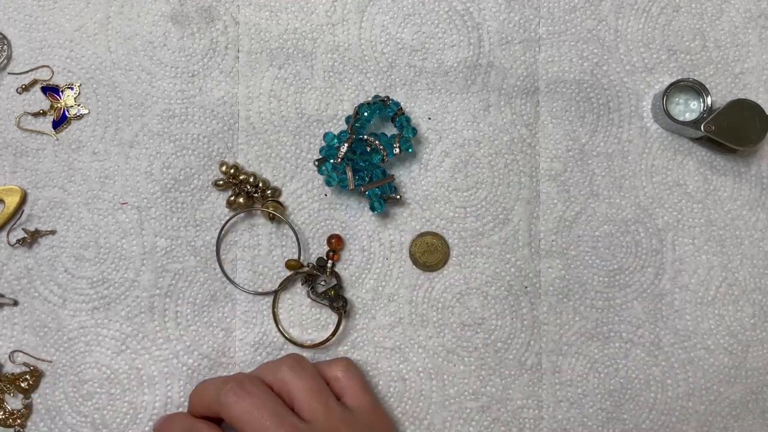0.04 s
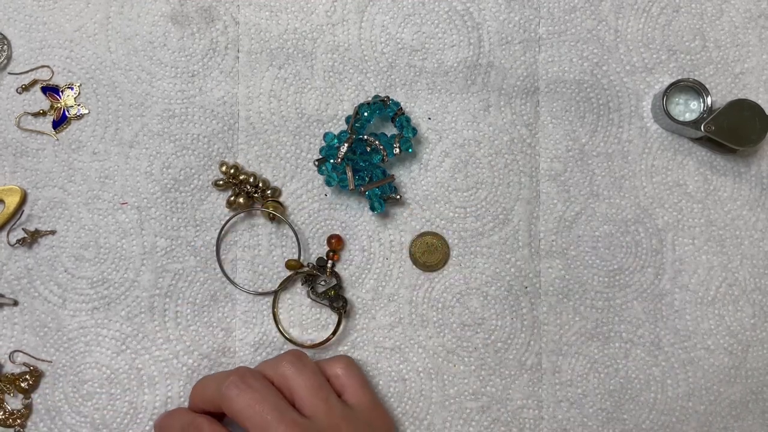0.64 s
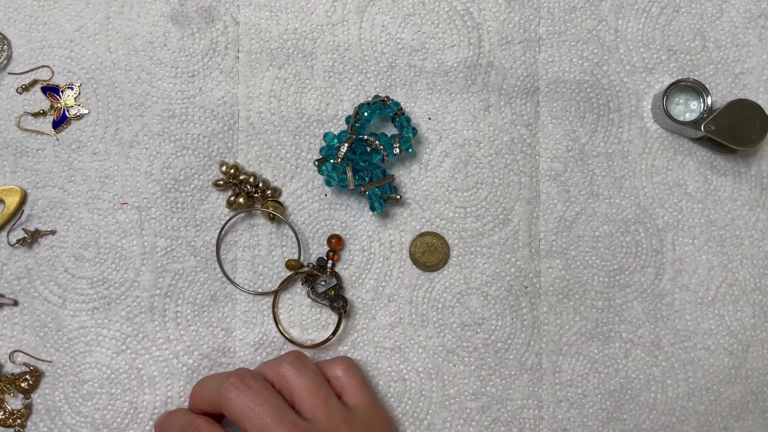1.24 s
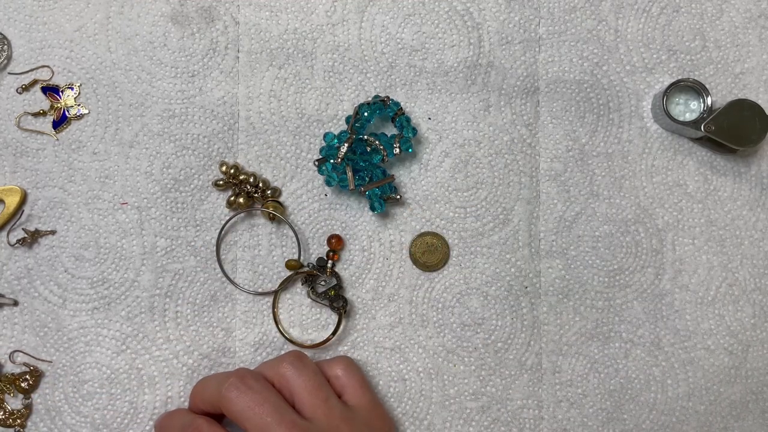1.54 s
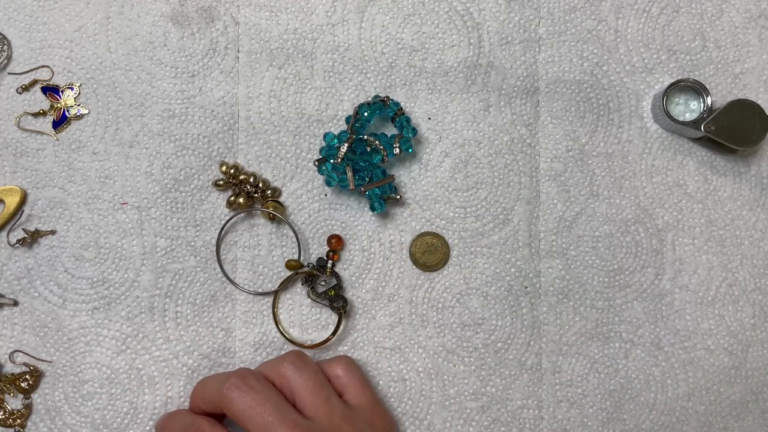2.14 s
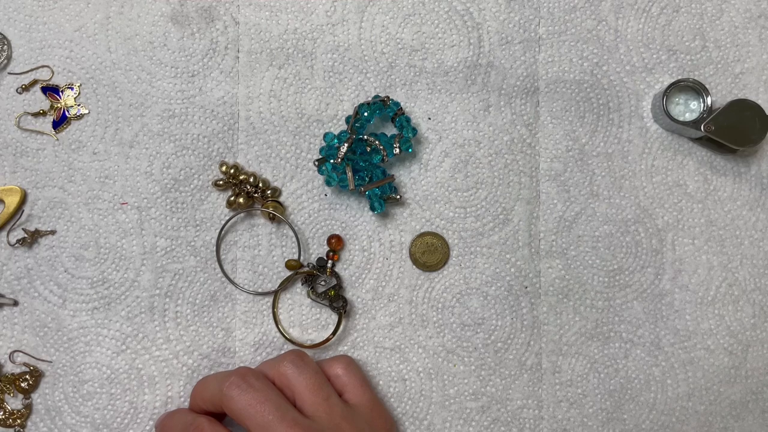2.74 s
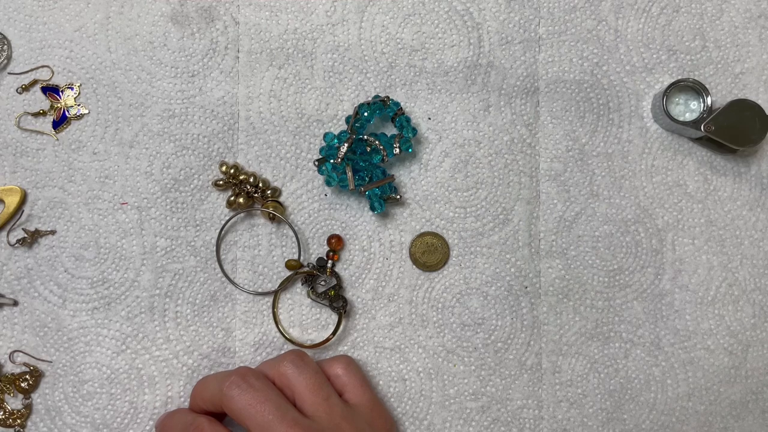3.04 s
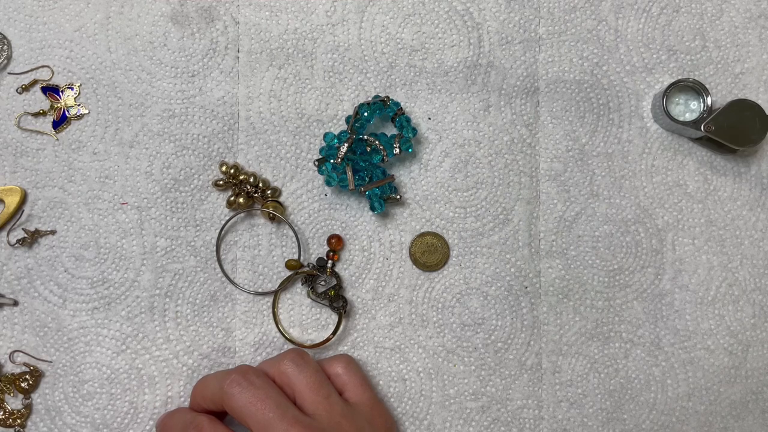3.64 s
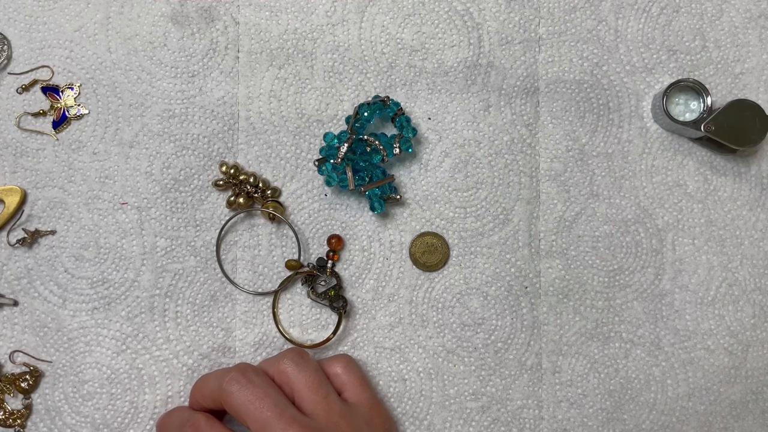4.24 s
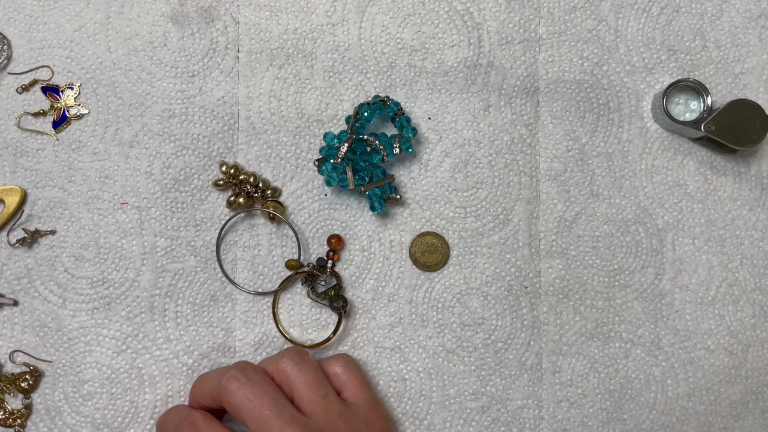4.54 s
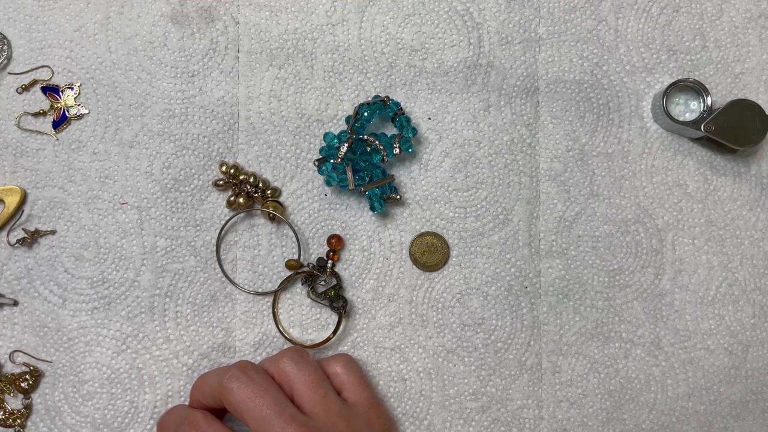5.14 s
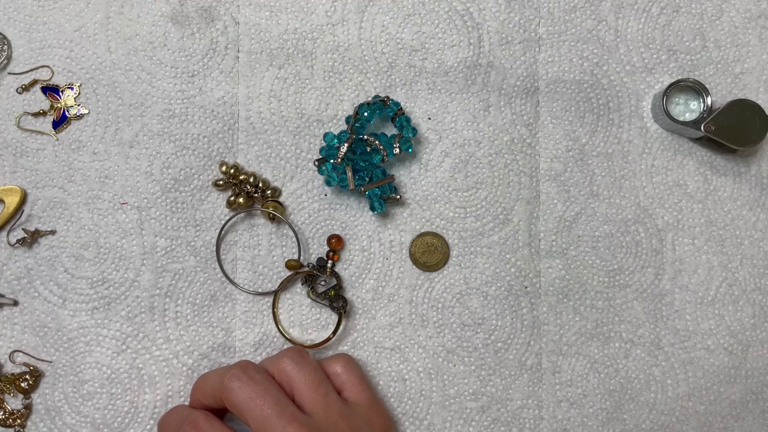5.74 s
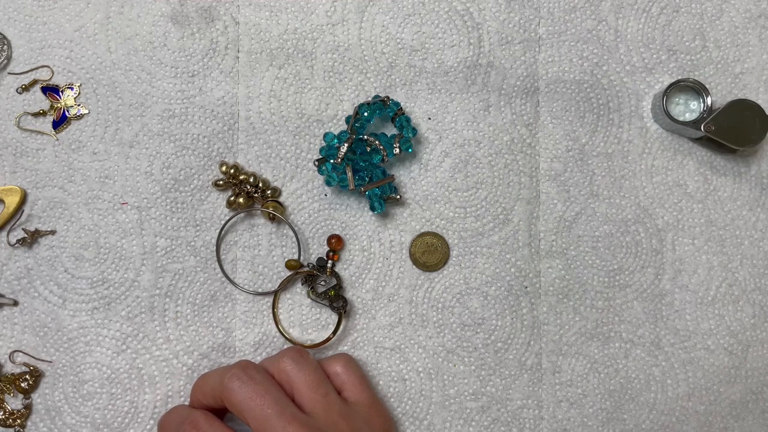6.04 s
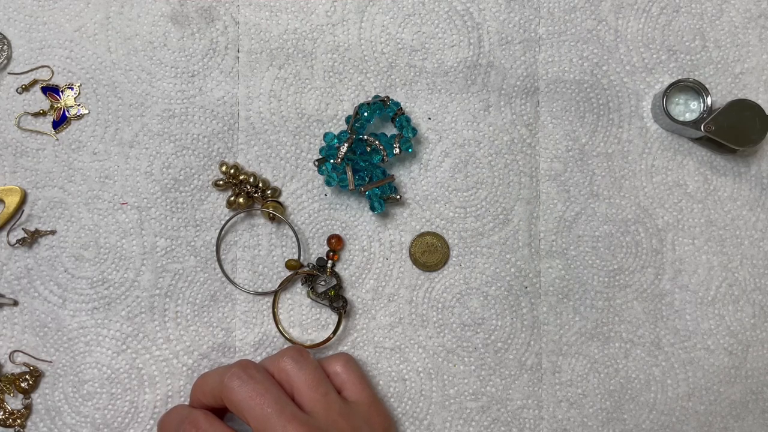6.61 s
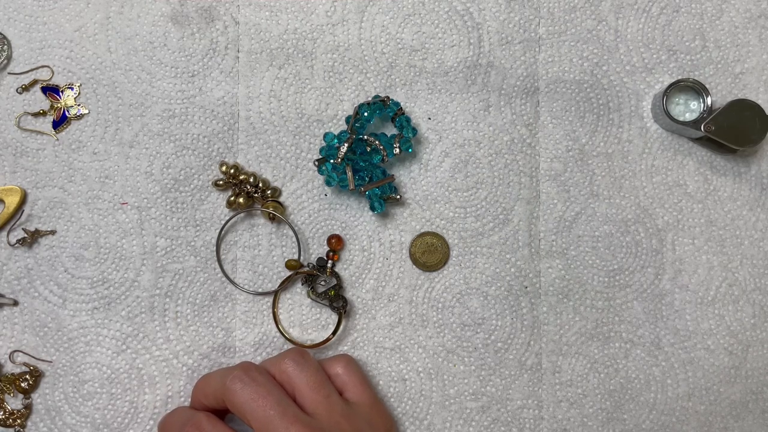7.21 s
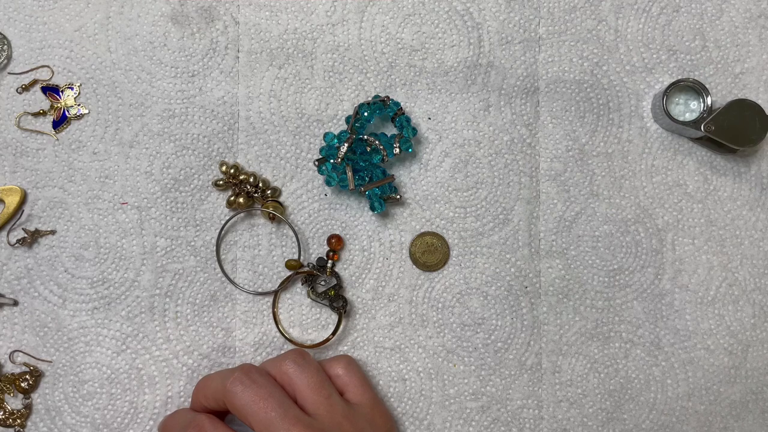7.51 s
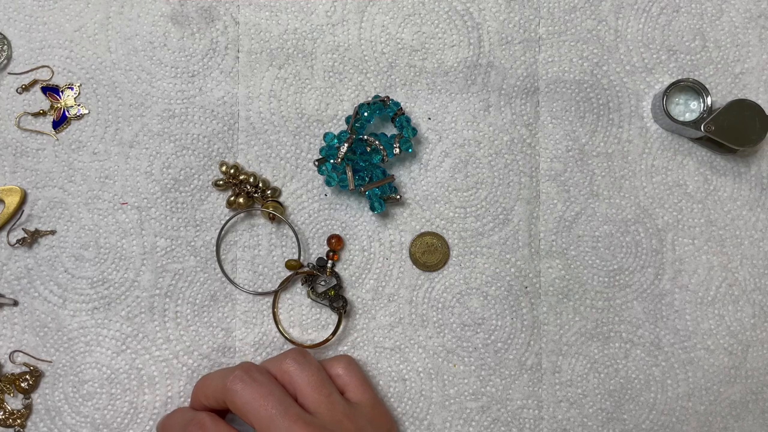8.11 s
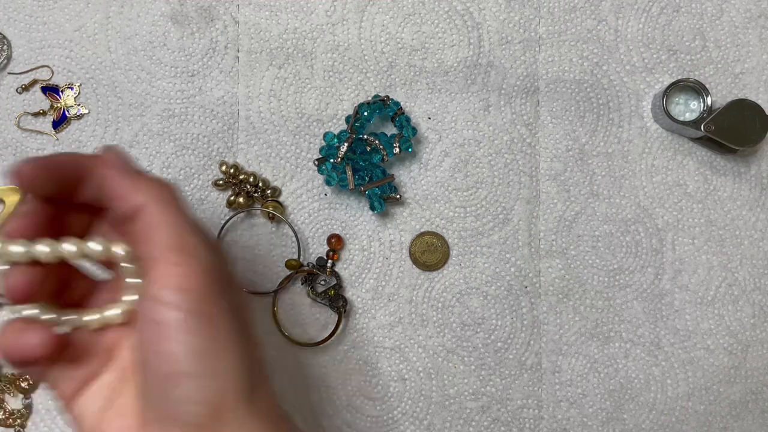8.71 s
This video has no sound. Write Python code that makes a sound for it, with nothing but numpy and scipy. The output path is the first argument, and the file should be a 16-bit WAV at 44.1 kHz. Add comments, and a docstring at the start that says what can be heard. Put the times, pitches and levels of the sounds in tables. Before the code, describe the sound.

A motor hums faintly somewhere in the house while fingers sort beads and small metal jewellery on a paper towel, near the microphone and a little to the left. A first cluster of taps and scrapes leads to one louder knock on the table. A pause follows, then more uneven clicks, hollow metal bumps, two tiny wire pings and a short scrape on the paper, ending with a few soft ticks.

```python
"""A small room, close to a table covered with a paper towel; two microphones in one case, to its right.
A motor hums somewhere in the house. A fingertip brushes the paper, then bead jewellery is picked over:
strands drag, pieces knock on the table top, beads click. At 2 s a slide makes the table groan, the
loudest knock lands and a hollow metal piece is bumped. After a lull the sorting goes on: a wire ring
pings twice, a hard edge rasps on the paper near 5.7 s, and the handling thins to a few light ticks."""
import sys
import numpy as np
from scipy import signal
from scipy.fft import rfft, irfft, next_fast_len
from scipy.io import wavfile

SR = 44100
rng = np.random.default_rng(int(sys.argv[2]) if len(sys.argv) > 2 else 0)


def store_wav(level_fs):
    """Save 16-bit WAV to argv[1]."""
    pcm = np.round(np.clip(np.atleast_2d(level_fs), -1, 1) * 32767)
    wavfile.write(sys.argv[1], SR, pcm.T.astype(np.int16))


N = 386316
TIME = np.arange(N) / SR

# Pieces land on the table. Each row: start in seconds, level in dB, fade in ms, pitch of the spot in Hz.
LANDINGS = [(0.3, -34.5, 1.7, 343), (0.367, -24.5, 0.81, 457), (0.516, -17.5, 2.1, 450),
            (0.701, -21, 1.1, 435), (0.775, -23.5, 0.56, 560), (1.123, -36, 1.8, 323),
            (1.214, -22, 0.23, 380), (2.3096, -7, 1.75, 400), (3.620, -16, 2.43, 517),
            (3.888, -27, 0.91, 540), (4.321, -32, 2.5, 496), (4.401, -25.5, 2.6, 502),
            (4.430, -21.5, 1.1, 490), (4.782, -25.5, 1, 445), (4.829, -23.5, 0.62, 370),
            (4.866, -23, 1.66, 510), (5.146, -32, 1.7, 534), (5.405, -26, 2.05, 463),
            (5.529, -33.5, 2.8, 460), (6.3319, -25.5, 3.6, 444), (7.153, -31, 2, 437),
            (7.170, -33, 3.4, 430), (7.227, -25, 1.47, 476), (7.447, -39.5, 3.4, 350),
            (8.2979, -39, 1, 720)]
# The bright colour of ticks and paper hiss. Each row: frequency in Hz, relative level in dB.
BRIGHT_SPECTRUM = [(1500, -45.5), (2700, -4), (4500, 2.5), (6500, -7.5), (8300, 5.5), (9500, 8),
                   (11000, 0.5), (15700, -1)]
# The dull colour of the table top. Each row: frequency in Hz, relative level in dB.
TABLE_SPECTRUM = [(130, -11), (250, -8.5), (370, -4), (510, -5), (1000, -20), (4000, -80.5)]


def from_db(db):
    """Decibels to gain."""
    return 10 ** (np.asarray(db) / 20)


def rms_one(x):
    """Scale to rms 1."""
    return x / np.sqrt(np.mean(x ** 2) + 1e-20)


def at_hz(points, hz):
    """Read a table on a log-frequency axis."""
    knots, values = np.transpose(points)
    return np.interp(np.log(np.maximum(hz, 1)), np.log(knots), values)


def butterworth(x, hz, kind, order=2):
    """Low-, high- or band-pass filter."""
    return signal.sosfilt(signal.butter(order, hz, kind, fs=SR, output="sos"), x + 1e-18)


def coloured(x, spectrum, size=8192):
    """Minimum-phase filter with the given spectrum; white noise keeps its power."""
    gains = from_db(at_hz(spectrum, np.fft.rfftfreq(size, 1 / SR)))
    cepstrum = irfft(np.log(gains))
    cepstrum[1:size // 2] *= 2
    cepstrum[size // 2 + 1:] = 0
    response = irfft(np.exp(rfft(cepstrum)))
    return signal.oaconvolve(x, response / np.linalg.norm(response))[:N]


def drift(per_s):
    """Smooth random wander of rms 1."""
    knots = rng.standard_normal(N // 10)
    return rms_one(np.interp(TIME * per_s, np.arange(len(knots)), knots))


def add(track, s, sound):
    """Mix a sound into a track at s seconds."""
    start = max(round(s * SR), 0)
    track[start:start + len(sound)] += sound[:max(N - start, 0)]


def motor_hum(shaft_hz=29.65, waver_db=3.5, waver_turns=0.022):
    """A motor elsewhere in the house hums on multiples of its shaft rate, wavering a little."""
    # Each row: multiple of the shaft rate, rms level in dB.
    harmonics = [(2, -55.5), (3, -51.5)]
    turns = shaft_hz * TIME + waver_turns * drift(0.65)
    hum = 0
    for multiple, db in harmonics:
        amplitude = from_db(db + waver_db * drift(6.1)) * np.sqrt(2)
        hum += amplitude * np.sin(2 * np.pi * (multiple * turns + rng.random()))
    return hum


def room_tone(level_db=-52):
    """The low rumble of the house, a little different at each microphone."""
    # Each row: frequency in Hz, relative level in dB.
    air_spectrum = [(20, -27), (40, -18.5), (62, -8.5), (80, 0.5), (100, -13.5), (137, -9.5), (160, -17.5),
                    (240, -18), (400, -28), (1000, -48), (2600, -57.5), (9000, -62.5)]
    # Stereo width. Each row: frequency in Hz, side against mid in dB.
    air_width = [(25, -1.5), (120, -11.5), (240, -5), (900, 2), (7500, -1), (15000, -9)]
    mid, side = [coloured(rng.standard_normal(N), air_spectrum) for _ in range(2)]
    size = next_fast_len(N)
    side_gain = from_db(at_hz(air_width, np.fft.rfftfreq(size, 1 / SR)))
    side = irfft(rfft(side, size) * side_gain, size)[:N]
    return from_db(level_db) * (mid + side * [[1], [-1]])


def friction(per_s, spread_db, smooth):
    """Fibres catch and let go: snaps of uneven size over a smooth hiss; rms 1."""
    sizes = from_db(spread_db * np.minimum(rng.exponential(1, N), 4)) * rng.choice([-1, 1], N)
    snaps = sizes * (rng.random(N) < per_s / SR)
    return rms_one(rms_one(snaps) + smooth * rng.standard_normal(N))


def fingertip_brushes(edge_s=.02):
    """Soft skin on paper: a dense, even hiss with no taps in it."""
    # Each row: start and end in seconds, level in dB.
    brushes = [(0.123, 0.32, -74.5), (1.988, 2.324, -67.5), (6.937, 7.16, -59.5), (8.224, 8.316, -70)]
    pressure = sum(from_db(db) * np.clip(np.minimum(TIME - start, end - TIME) / edge_s, 0, 1)
                   for start, end, db in brushes)
    return coloured(pressure * friction(per_s=1100, spread_db=0.5, smooth=1.5), BRIGHT_SPECTRUM)


def rattle(per_s, spread_db, smooth):
    """Beads of many sizes tap as they slide, each size in its own band; rms 1."""
    edges_hz = np.geomspace(600, 17000, 7)
    return rms_one(sum(butterworth(friction(per_s, spread_db, smooth), band, "band")
                       for band in zip(edges_hz, edges_hz[1:])))


def strand_drags(soft_db=-71, usual_db=-51, jerk_db=3, rise_s=0.022):
    """Beads and fingers slide jerkily over the embossed paper and shake the table under it."""
    # Each row: start and end in seconds, strength in dB.
    strokes = [(0.288, 0.464, -51), (0.487, 0.575, -42), (0.635, 0.721, -51), (0.773, 0.874, -56.5),
               (1.127, 1.464, -65), (1.522, 1.918, -71.5), (1.973, 2.218, -63), (2.335, 2.49, -51),
               (3.872, 4.035, -54.5), (4.573, 4.751, -64), (4.757, 4.904, -51.5), (5.037, 5.168, -52),
               (5.368, 5.426, -53), (5.528, 5.766, -56), (6.295, 6.423, -46.5), (6.433, 6.625, -62.5),
               (6.712, 7.004, -61), (7.011, 7.158, -53), (8.631, 8.687, -62.5)]
    # Each row: frequency in Hz, relative level in dB.
    scrape_spectrum = [(800, 0), (1200, 2.5), (1750, 6), (3000, -4.5), (4800, -5), (5600, -9.5),
                       (6500, -4.5), (8200, -36.5)]
    pressure, bead_share = np.zeros((3, N)), np.zeros(N)
    for start, end, db in strokes:
        span = slice(round(start * SR), round(end * SR))
        t, harder_db = TIME[span], db - usual_db
        rumble_db, scrape_db, hiss_db = -46.5 + 0.84 * harder_db, db + 1, -61.5 + 0.99 * harder_db
        envelope = np.clip(np.minimum(t - start, 2 * (end - t)) / rise_s, 0, 1)
        pressure[:, span] += from_db([rumble_db, scrape_db, hiss_db])[:, None] * envelope
        # the lightest drags are fingers alone; crackling beads take over in harder ones
        bead_share[span] = np.interp(db, [soft_db, usual_db], [0, 1])
    rumble, scrape, hiss = pressure * from_db(jerk_db * drift(70))
    beads = np.sqrt(bead_share) * rattle(per_s=300, spread_db=4, smooth=0.3)
    fingers = np.sqrt(1 - bead_share) * rng.standard_normal(N)
    grains = beads + fingers
    table = coloured(rumble * rng.standard_normal(N), TABLE_SPECTRUM)
    return table + coloured(scrape * grains, scrape_spectrum) + coloured(hiss * grains, BRIGHT_SPECTRUM)


def table_knocks(glide=0.97, glide_s=0.00069, thump_hz=131, thump_s=0.033, thump_db=-28,
                 shudder_s=0.047, shudder_db=-20):
    """Bending waves cross the table top, the high ones first, so each knock falls onto its pitch."""
    # The soft hand drops and stirs only the lowest mode. Each row: start in seconds, level in dB.
    hand_drops = [(4.326, -41), (4.867, -34.5), (5.385, -36)]
    out, shudder, t = np.zeros(N), np.zeros(N), TIME[:SR // 10]
    thump = np.exp(-t / thump_s) * np.sin(2 * np.pi * thump_hz * t)
    for s, db, fade_ms, hz in LANDINGS:
        age = t * 1000 / fade_ms
        turns = hz * (t + glide * glide_s * (1 - np.exp(-t / glide_s)))
        knock = age * np.exp(1 - age) * np.sin(2 * np.pi * turns)
        add(out, s, from_db(db) * (knock + from_db(thump_db) * thump))
        # waves reflected from the edges leave the whole top shuddering
        add(shudder, s, from_db(db + shudder_db) * np.exp(-t / shudder_s) * rng.standard_normal(len(t)))
    for s, db in hand_drops:
        add(out, s, from_db(db) * thump)
    return out + coloured(shudder, TABLE_SPECTRUM)


def contact(chatter_s, graze_s, firmness):
    """A graze, one firm touch 10 ms in, and a dying chatter of smaller ones; energy 1."""
    t = TIME[:SR // 16] - .01
    touches = rng.standard_normal(len(t)) ** 3 * np.exp(np.minimum(t / graze_s, -t / chatter_s))
    touches /= np.linalg.norm(touches)
    touches[round(.01 * SR)] += firmness
    return touches / np.linalg.norm(touches)


def contacts(rows, chatter_s, graze_s, firmness):
    """A track of contacts. Each row: time of the firm touch in seconds, level in dB."""
    track = np.zeros(N)
    for s, db in rows:
        add(track, s - .01, from_db(db) * contact(chatter_s, graze_s, firmness))
    return track


def jewellery_clicks(clack_db=10, tick_db=23, tick_offset_db=-27.5, ring_db=7, ring_q=4.5):
    """Pieces and beads clack from the body and tick from the surface; gives direct sound and room feed."""
    # Beads click together. Each row: time in seconds, relative level in dB, pitch of the bead in Hz.
    bead_hits = [(0.3197, -21.5, 1870), (0.3665, -19, 1570), (0.374, -19, 2920), (0.409, -17.5, 4400),
                 (0.4325, -27, 1900), (0.477, -28, 5060), (0.631, -20, 2770), (0.709, -22, 2300),
                 (1.353, -36.5, 2280), (1.6875, -37, 1560), (2.3135, -15, 2000), (2.3295, -8, 2020),
                 (2.4017, -16.5, 2700), (3.9776, -25, 1855), (4.0112, -23, 2220), (4.3362, -17.5, 3000),
                 (4.675, -33.5, 3020), (5.3808, -25, 1730), (5.611, -26, 3230), (6.3141, -21, 1770),
                 (6.330, -20, 4600), (6.3735, -18, 1720), (6.5905, -31.5, 2840), (6.656, -31.5, 2150),
                 (6.7359, -28.5, 2150), (6.784, -22.5, 2100), (7.0215, -28.5, 2340), (7.058, -20.5, 2900),
                 (7.120, -29, 1870)]
    # Clasps and links, metal on metal, only tick. Each row: time in seconds, relative level in dB.
    clasp_hits = [(0.643, -44.5), (0.703, -46), (2.3184, -34), (2.953, -69), (4.32, -36.5), (4.879, -45),
                  (5.5589, -44), (5.755, -62), (6.331, -41), (7.036, -42.5), (7.657, -71), (7.815, -63),
                  (8.119, -67), (8.329, -38), (8.6343, -54), (8.645, -48)]
    # Each row: frequency in Hz, relative level in dB.
    clack_spectrum = [(300, -32), (750, 5.5), (1150, 0.5), (1900, -2.5), (2800, -10), (4700, -11.5),
                      (5700, -18.5), (6600, -10), (8200, -42)]
    beads = np.zeros(N)
    for s, db, hz in bead_hits:
        touch = contact(chatter_s=.002, graze_s=.0007, firmness=.5)
        ring = signal.lfilter(*signal.iirpeak(hz, ring_q, fs=SR), touch)
        add(beads, s - .01, from_db(db) * (touch + from_db(ring_db) * ring) / 2)
    clack_hits = [(s, db) for s, db, _, _ in LANDINGS]
    tick_hits = [(s, db + tick_offset_db) for s, db, *_ in clack_hits + bead_hits] + clasp_hits
    clacks = contacts(clack_hits, chatter_s=0.0033, graze_s=0.0012, firmness=0.17)
    ticks = contacts(tick_hits, chatter_s=.0024, graze_s=.0012, firmness=.1)
    # the room gathers a contact from all directions at once, so its tail has an even spectrum
    even_clacks, even_ticks = np.zeros((2, N))
    for track, rows in (even_clacks, clack_hits), (even_ticks, tick_hits):
        for s, db in rows:
            add(track, s, from_db([db]))
    return np.array([from_db(clack_db) * coloured(body + beads, clack_spectrum)
                     + from_db(tick_db) * coloured(surface, BRIGHT_SPECTRUM)
                     for body, surface in [(clacks, ticks), (even_clacks, even_ticks)]])


def stick_slip(hz, half_width_hz):
    """The rough tone of quick slips, which steady pressure keeps about equally strong."""
    grain = butterworth(rng.standard_normal((2, N)), half_width_hz, "low")
    grain = rms_one(grain / np.sqrt(np.hypot(*grain)))
    phase = 2 * np.pi * np.cumsum(hz * np.ones(N)) / SR
    return grain[0] * np.sin(phase) + grain[1] * np.cos(phase)


def table_groans():
    """A piece pressed down as it slides sticks and slips, and the table groans."""
    # Each row: start, hardest push and end in seconds, level in dB.
    slides = [(2.047, 2.051, 2.062, -34), (2.055, 2.09, 2.165, -38.5), (2.265, 2.313, 2.314, -39),
              (5.66, 5.74, 5.765, -35.5)]
    push = sum(from_db(db) * np.sqrt(np.interp(TIME, [start, hardest, end], [0, 1, 0]))
               for start, hardest, end, db in slides)
    return push * stick_slip(hz=485, half_width_hz=95)


def hollow_bumps(level_db=-2):
    """A hollow metal piece answers each bump with its own modes."""
    # Each row: time in seconds, relative level in dB.
    bumps = [(2.334, -34), (3.628, -43), (4.337, -38), (4.4003, -43.5), (4.4287, -35), (4.8651, -35.5),
             (4.872, -43), (5.1438, -41), (5.5586, -36), (5.567, -43), (7.153, -45.5)]
    # Each row: frequency in Hz, relative level in dB, seconds to fall by 60 dB.
    modes = [(1080, 9.5, 0.0099), (1660, 17, 0.016), (1900, 2, 0.007), (3190, 1.5, 0.0045)]
    t = TIME[:SR // 10]
    touches = contacts(bumps, chatter_s=.004, graze_s=.0008, firmness=2)
    ring = sum(from_db(db - 60 * t / t60) * np.sin(2 * np.pi * hz * t) for hz, db, t60 in modes)
    return from_db(level_db) * signal.oaconvolve(touches, ring)[:N]


def wire_pings(mode_hz=15650, t60_s=.008):
    """A thin wire ring rattles briefly on its one very high mode."""
    # Each row: time in seconds, relative level in dB.
    pings = [(4.32, -25), (5.559, -36)]
    t = TIME[:SR // 10]
    touches = contacts(pings, chatter_s=0.004, graze_s=.001, firmness=0.59)
    ring = from_db(-60 * t / t60_s) * np.sin(2 * np.pi * mode_hz * t)
    return signal.oaconvolve(touches, ring)[:N]


def edge_rasp(sag_share=0.327, sag_s=.012, stop_s=0.005, grit_db=-60):
    """A hard edge rasps along the paper, swelling, then sinking in pitch as it stops short."""
    # Each row: start and end in seconds, level in dB, pitch and half width in Hz.
    rasps = [(5.627, 5.759, -47, 3070, 423)]
    out = np.zeros(N)
    for start, end, db, hz, half_width_hz in rasps:
        swell = np.clip(np.minimum((TIME - start) / (end - start), (end - TIME) / stop_s), 0, 1)
        sag = 1 - sag_share * np.exp(np.minimum(TIME - end, 0) / sag_s)
        out += from_db(db) * np.sqrt(swell) * stick_slip(hz * sag, half_width_hz)
        # the edge catches on single fibres
        grit = coloured(rattle(per_s=200, spread_db=3, smooth=0), BRIGHT_SPECTRUM)
        out += from_db(grit_db) * swell * grit
    return out


def reflections(early_db=3, early_s=0.016, gap_s=0.0025, alike=0.043):
    """Dense early reflections, then a tail that dies band by band; slightly alike on both sides."""
    # Each row: frequency in Hz, seconds for the room to fall by 60 dB.
    decay_times = [(150, 0.053), (600, 0.66), (1700, 0.57), (15000, 0.31)]
    t = TIME[:SR * 3 // 4]
    hz = np.fft.rfftfreq(len(t), 1 / SR)
    shared, own = rng.standard_normal(len(t)), rng.standard_normal((2, len(t)))
    white = rfft(np.sqrt(alike) * shared + np.sqrt(1 - alike) * own)
    edges_hz = np.geomspace(80, 20000, 13)
    tail = 0
    for low, high in zip(edges_hz, edges_hz[1:]):
        band = irfft(white * ((hz >= low) & (hz < high)), len(t))
        tail += band * from_db(-60 * t / at_hz(decay_times, np.sqrt(low * high)))
    tail *= np.clip(t / gap_s - 1, 0, 1) * (1 + from_db(early_db) * np.exp(-t / early_s))
    return tail / np.linalg.norm(tail[0])


def small_room(x, patterns=5, moves_per_s=7):
    """The hands keep moving, so the sound passes from one pattern of reflections to the next."""
    place = TIME * moves_per_s
    out = 0
    for k in range(patterns):
        nearness = np.maximum(1 - np.abs((place - k) % patterns - 1), 0)
        feed = x * np.sin(np.pi / 2 * nearness)
        out += signal.oaconvolve(feed[None], reflections(), axes=1)[:, :N]
    return out


def microphones(pair, crossover_hz=8000, turn_hz=9300, turn_q=3):
    """Sound reaches the left microphone first and, above the bass, louder: the case shades the right."""
    # Longer where sound bends round the case. Each row: frequency in Hz, delay on the right in ms.
    right_lag = [(500, 0.52), (2000, 0.404)]
    # Each row: frequency in Hz, dB by which the left is louder.
    case_shade = [(100, -3), (700, 3.5), (2000, 1), (5000, 6)]
    size = next_fast_len(N + SR)
    hz = np.fft.rfftfreq(size, 1 / SR)
    delay = np.exp(-2j * np.pi * hz * at_hz(right_lag, hz) / 1000)
    lean = from_db(at_hz(case_shade, hz) / 2)
    shaded = irfft(rfft(pair, size) * [lean, delay / lean], size)[:, :N]
    # both sides share the top treble, with a turn of phase between them
    left = pair[0]
    turned = 2 * signal.lfilter(*signal.iirnotch(turn_hz, turn_q, fs=SR), left) - left
    treble = butterworth(np.array([turned, left]), crossover_hz, "high", order=11)
    return butterworth(shaded, crossover_hz, "low", order=11) + treble


def scene(knock_wet_db=-10.5, click_wet_db=-3, rub_wet_db=-4, judder_wet_db=-11, lowest_hz=70):
    """The handling close by on the left, with the room's reflections, over the hum of the house."""
    knocks = table_knocks()
    rubs = strand_drags() + fingertip_brushes()
    judders = table_groans() + edge_rasp()
    clicks, clicks_to_room = jewellery_clicks() + hollow_bumps() + wire_pings()
    reflected = small_room(from_db(knock_wet_db) * knocks + from_db(click_wet_db) * clicks_to_room
                           + from_db(rub_wet_db) * rubs + from_db(judder_wet_db) * judders)
    # the handling carries no deep bass
    handling = butterworth(knocks + clicks + rubs + judders + reflected, lowest_hz, "high")
    return microphones(handling) + motor_hum() + room_tone()


def record(dry):
    """The sound fades in over 3 ms and is cut steeply above 16.1 kHz."""
    faded_in = dry * np.clip(TIME / .003, 0, 1)
    return signal.sosfilt(signal.ellip(10, .1, 80, 16100, fs=SR, output="sos"), faded_in)


dry = scene()
out = record(dry)
store_wav(out)
```